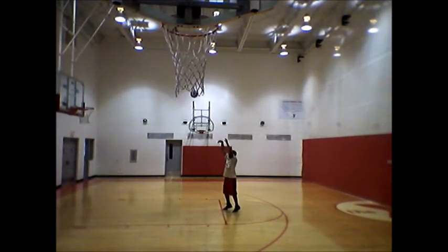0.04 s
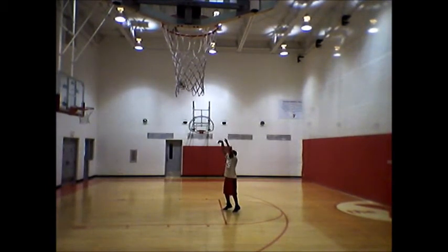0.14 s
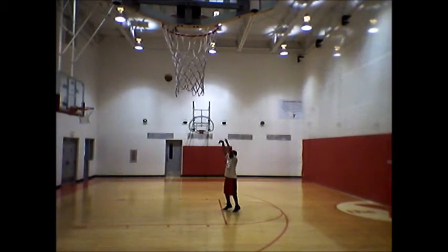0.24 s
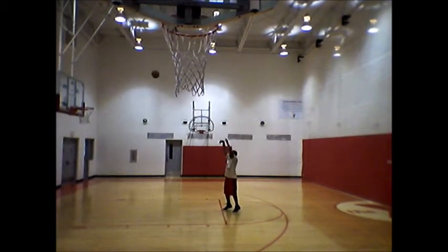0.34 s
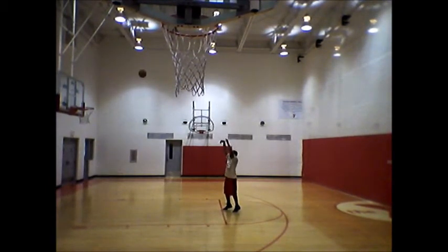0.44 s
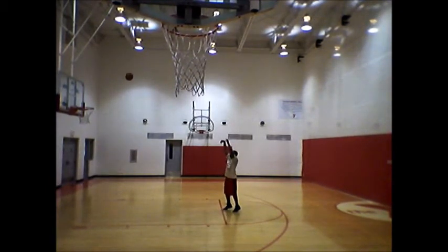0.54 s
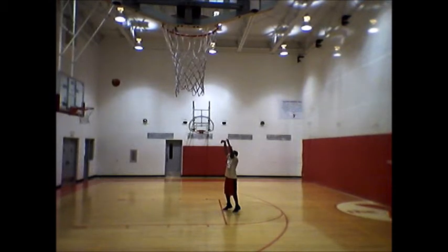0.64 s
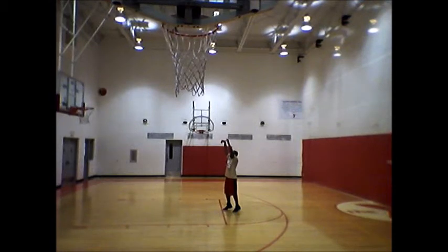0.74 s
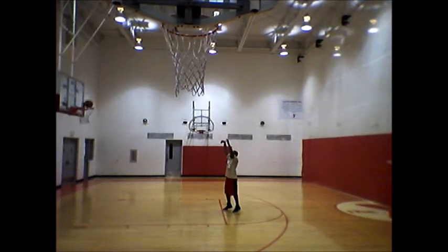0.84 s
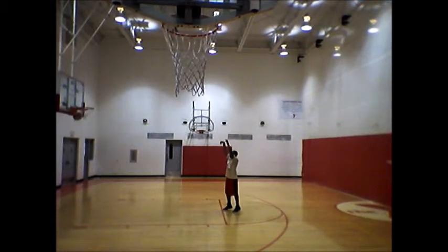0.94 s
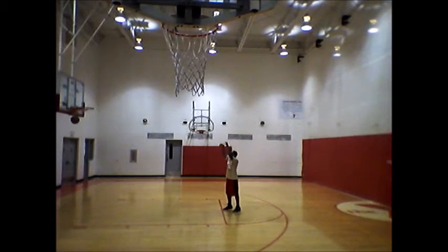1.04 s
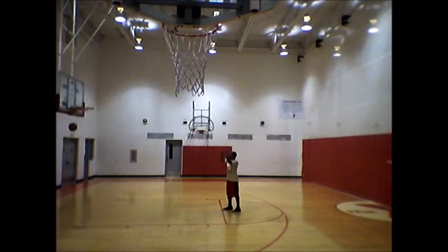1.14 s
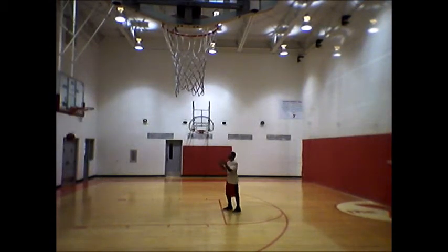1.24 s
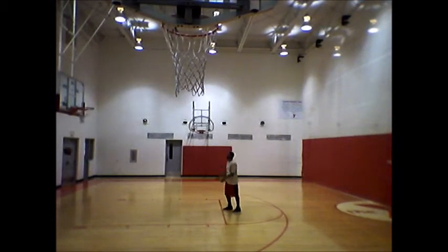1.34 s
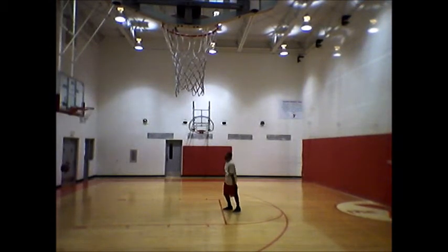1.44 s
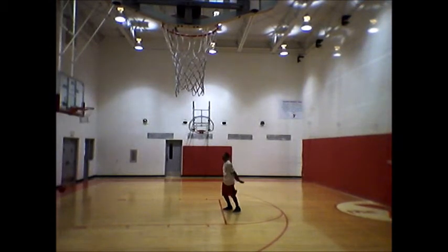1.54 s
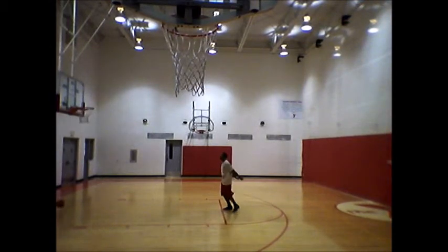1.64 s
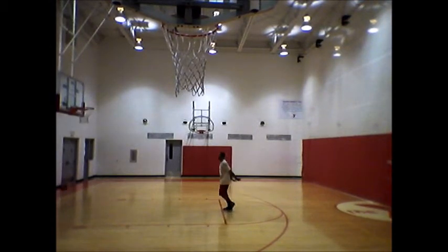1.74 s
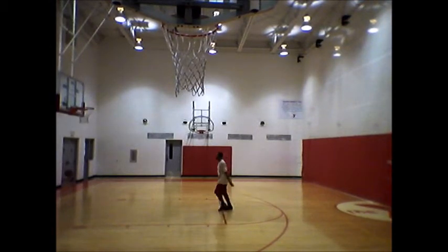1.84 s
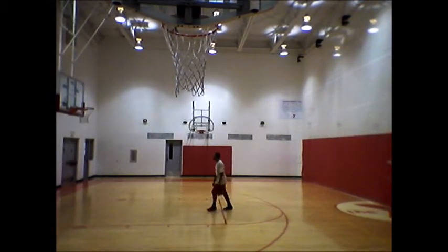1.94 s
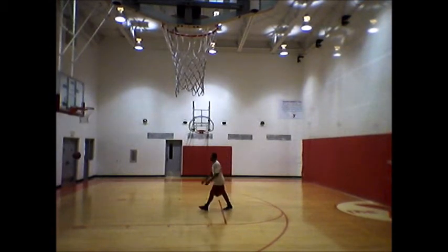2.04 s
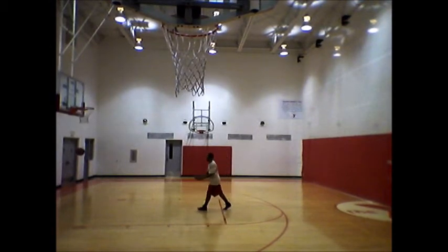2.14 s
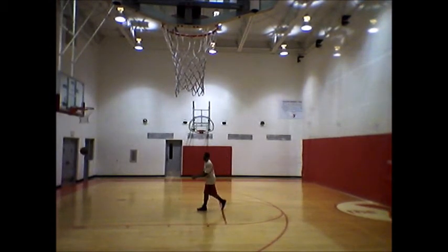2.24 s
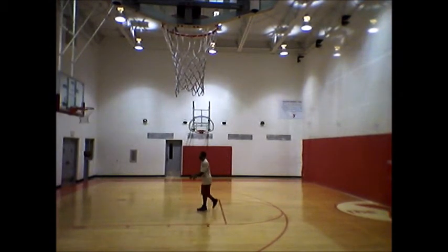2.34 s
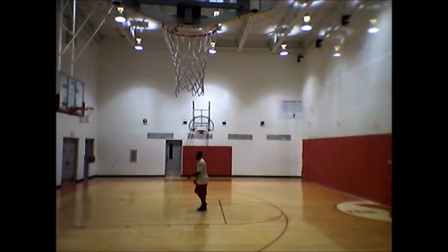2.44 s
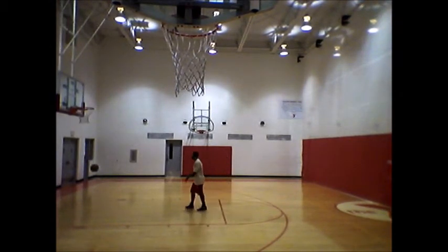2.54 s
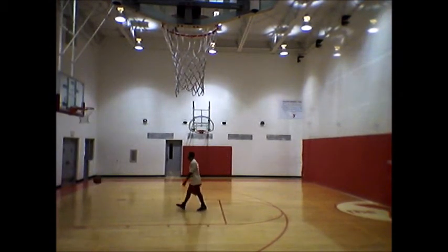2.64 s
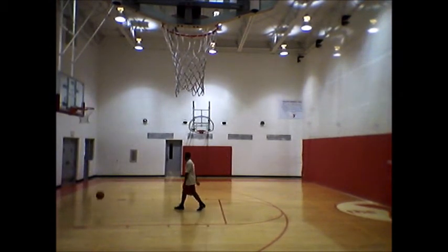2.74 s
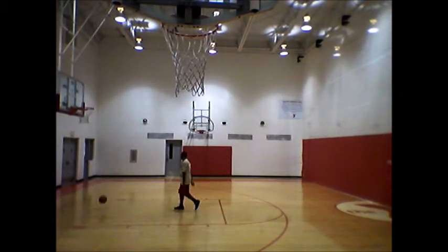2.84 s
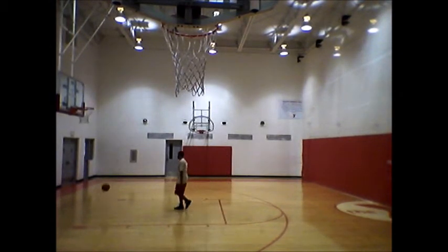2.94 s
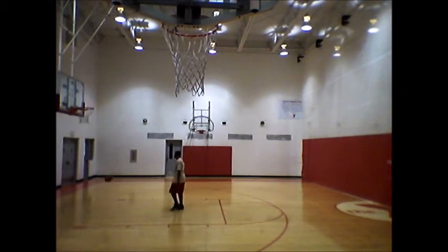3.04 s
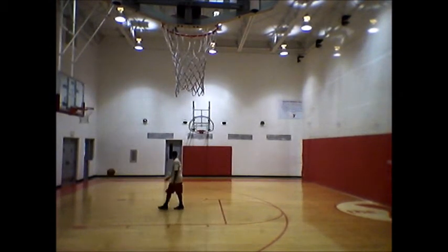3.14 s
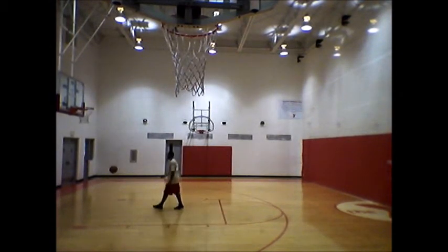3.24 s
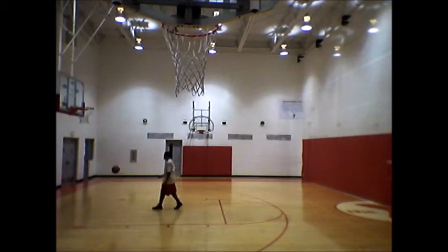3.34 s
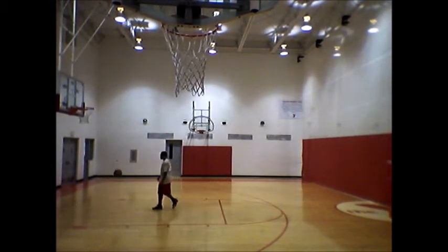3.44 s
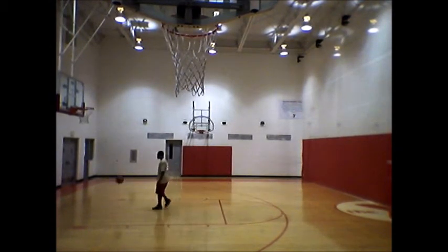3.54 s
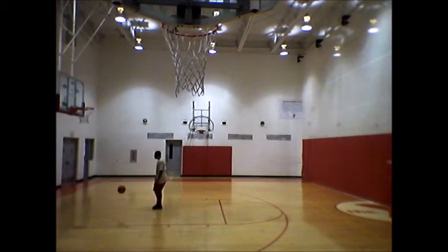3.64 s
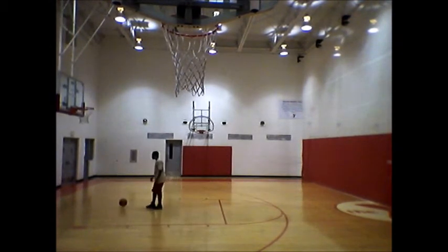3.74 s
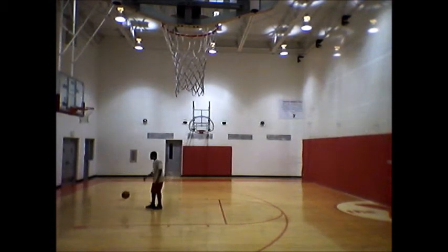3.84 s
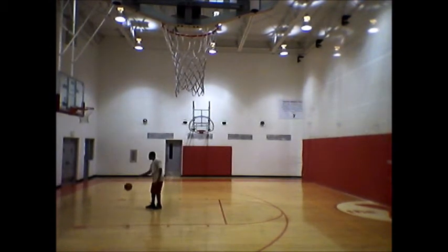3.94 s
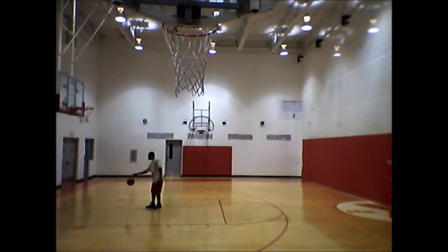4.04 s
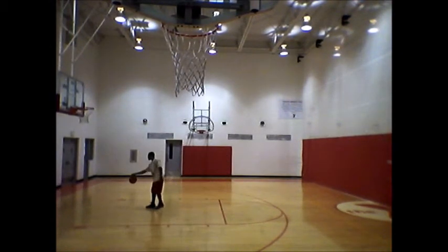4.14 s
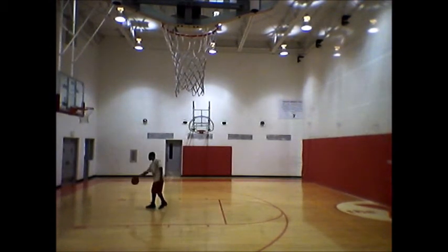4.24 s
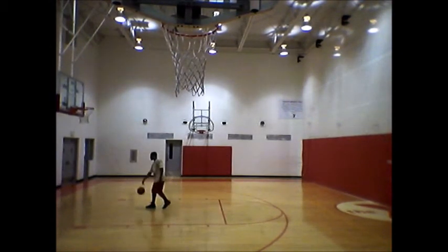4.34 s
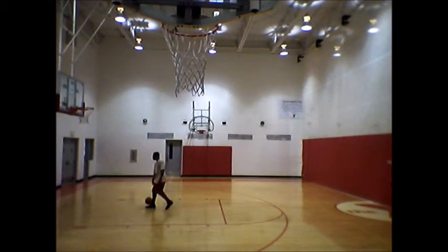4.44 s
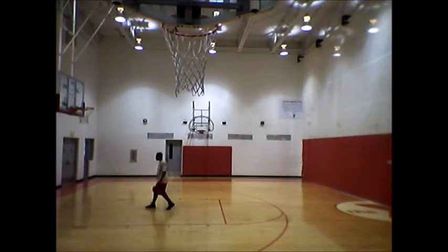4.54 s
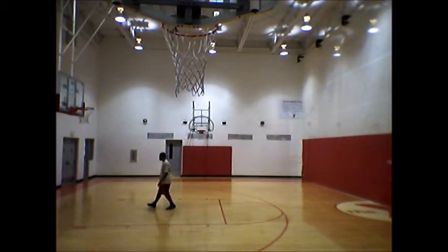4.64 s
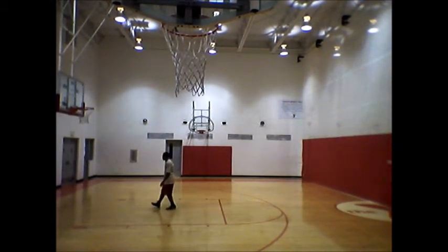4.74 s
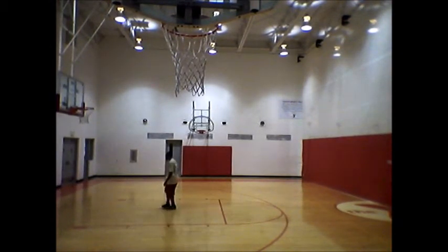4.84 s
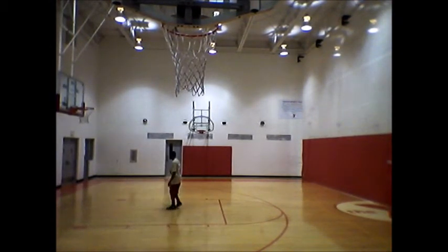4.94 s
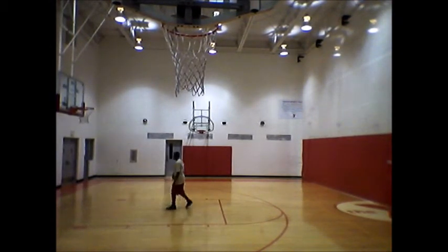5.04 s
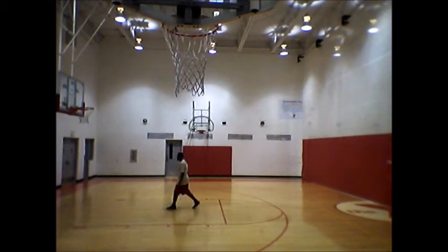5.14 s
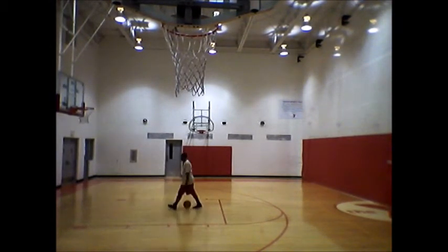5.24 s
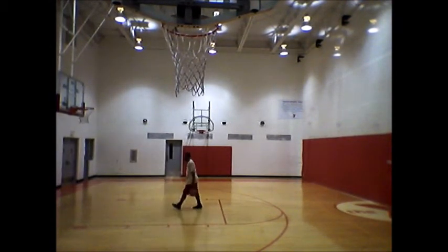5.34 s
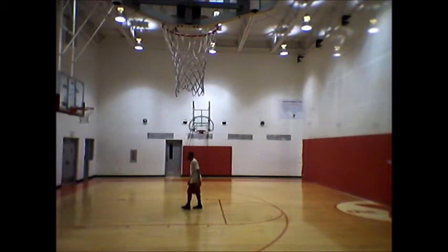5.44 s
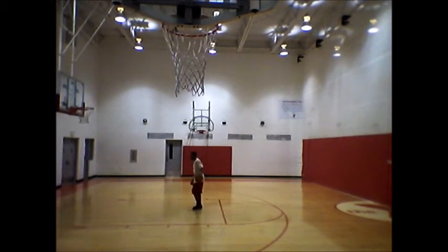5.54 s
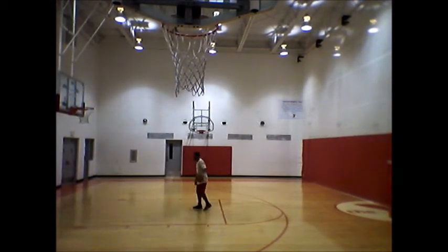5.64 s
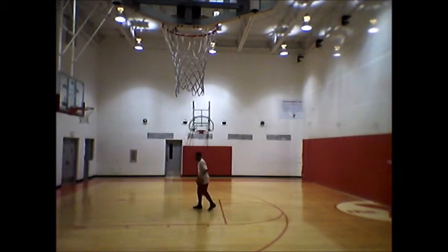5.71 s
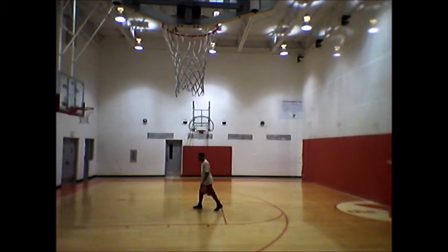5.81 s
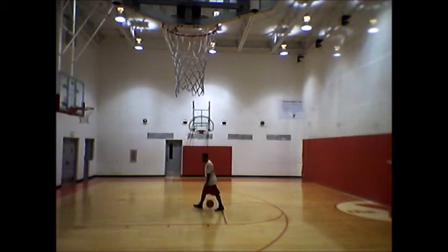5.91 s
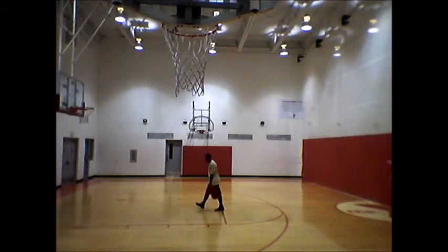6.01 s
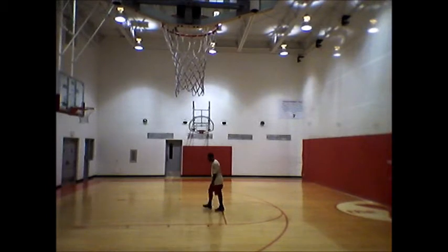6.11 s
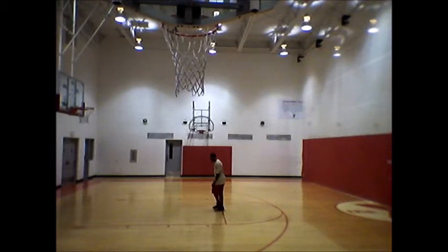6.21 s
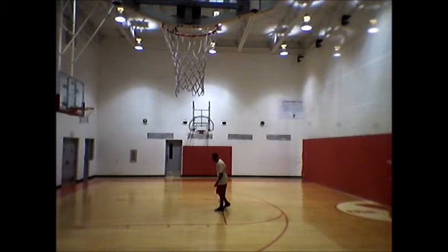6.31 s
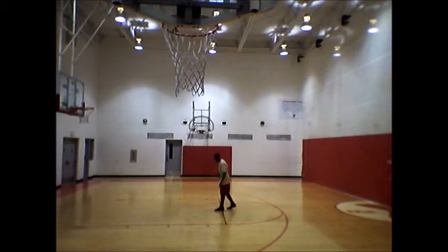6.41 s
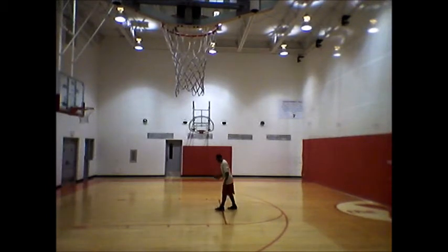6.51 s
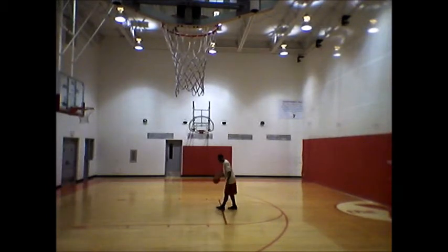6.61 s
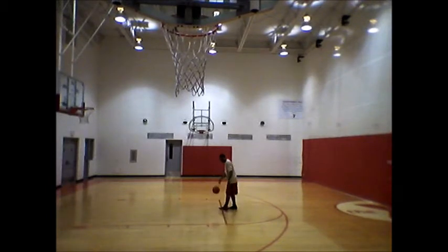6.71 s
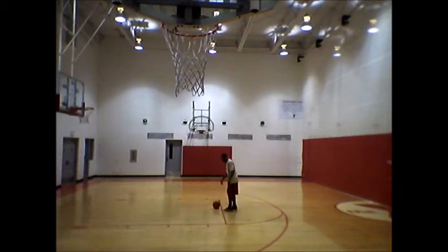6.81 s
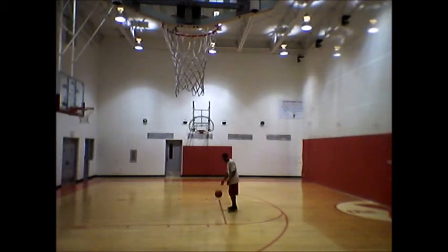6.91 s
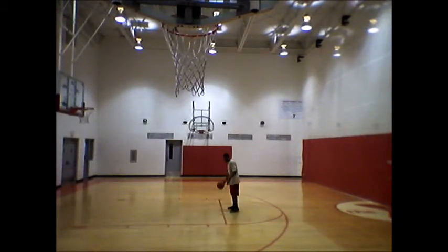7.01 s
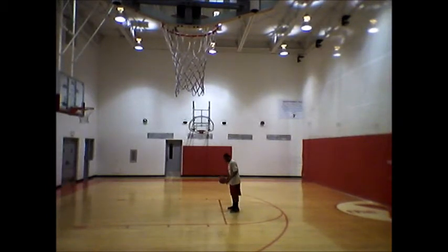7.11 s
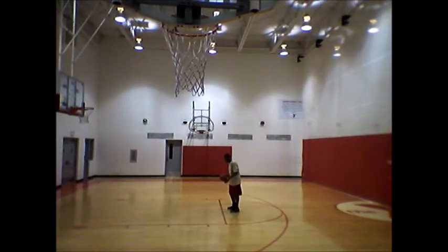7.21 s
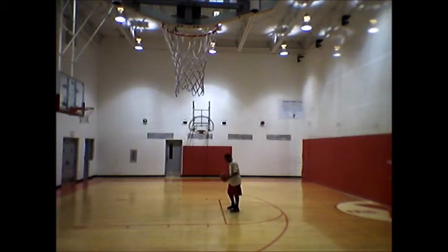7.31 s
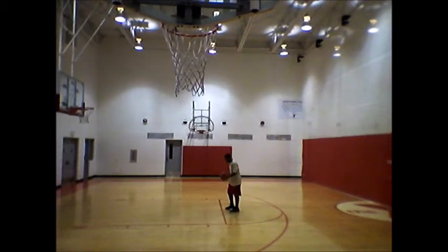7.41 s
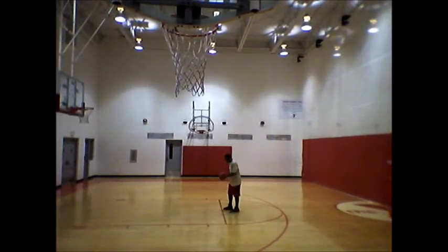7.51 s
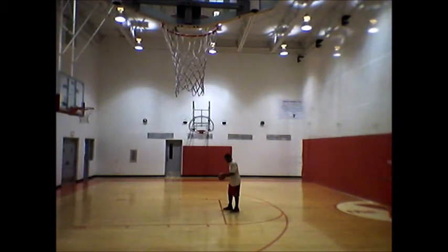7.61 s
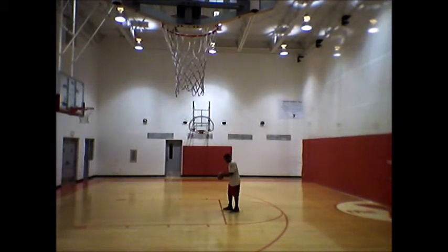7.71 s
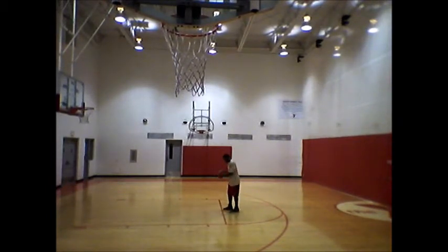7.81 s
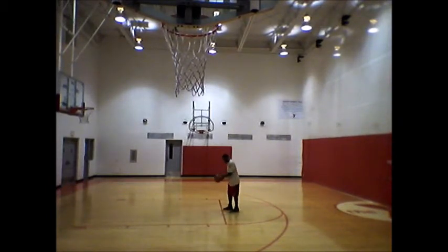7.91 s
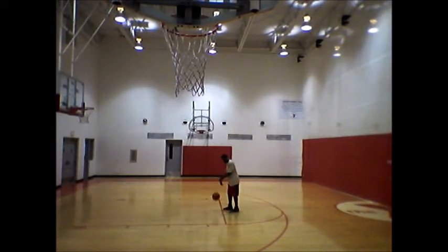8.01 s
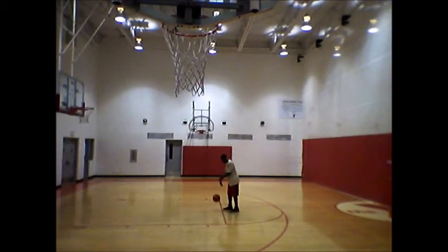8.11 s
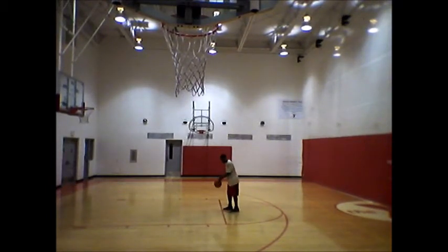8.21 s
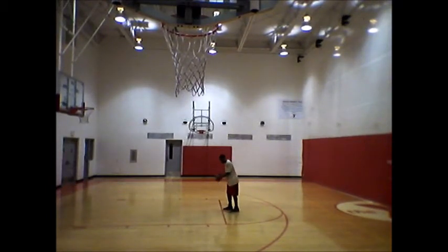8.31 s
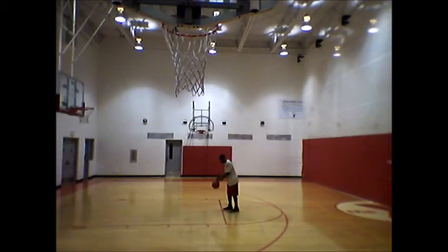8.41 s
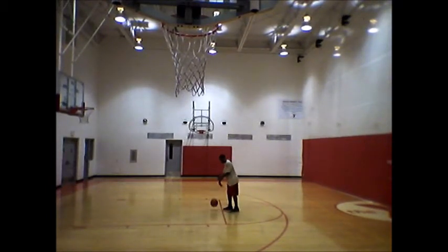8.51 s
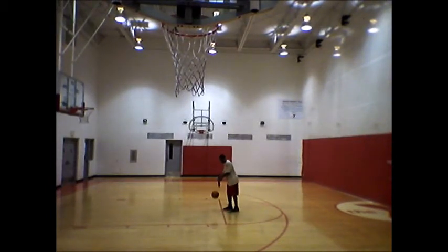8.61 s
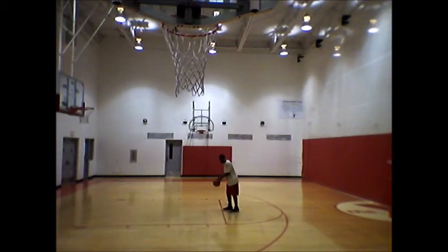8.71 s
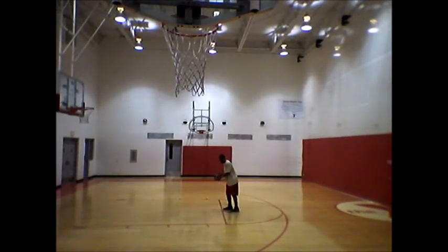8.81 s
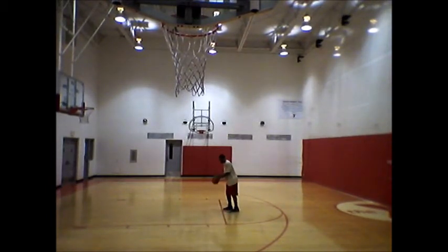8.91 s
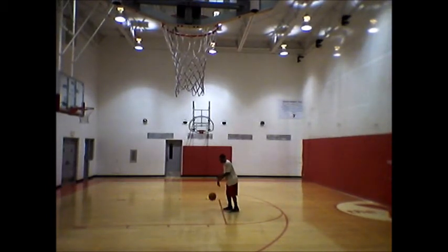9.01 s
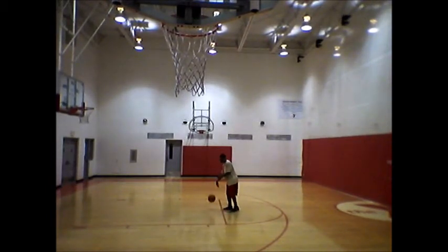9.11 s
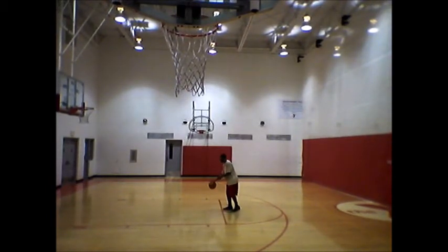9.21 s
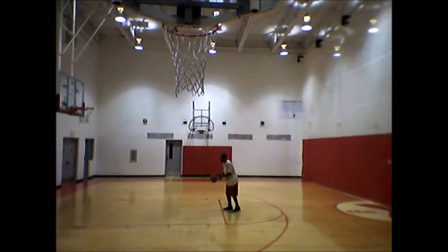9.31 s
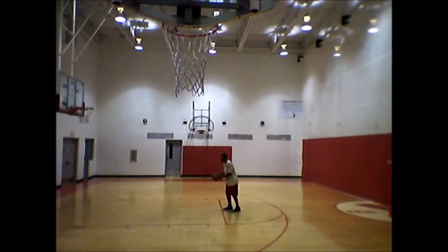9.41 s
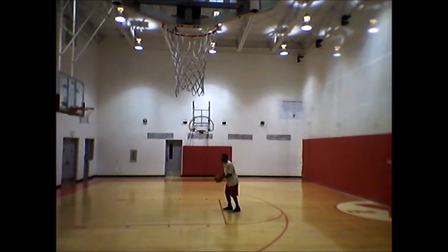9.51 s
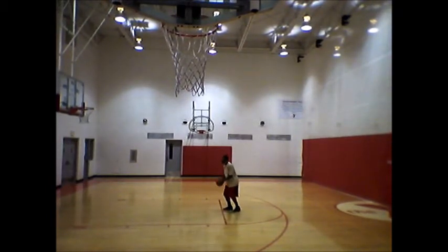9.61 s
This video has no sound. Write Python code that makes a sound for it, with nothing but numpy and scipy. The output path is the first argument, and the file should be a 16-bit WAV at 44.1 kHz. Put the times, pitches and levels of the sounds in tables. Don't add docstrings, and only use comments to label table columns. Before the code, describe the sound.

A soft, quick rattle of a basketball on a far hoop at one second, then ten separate bounces on a sprung wooden floor, unevenly spaced, about half a second to over a second apart. Each is a sharp slap with a short woody thump and hollow ring, echoing off walls and roof. Faint ventilation rush and lamp buzz fill the pauses. One distant microphone, large empty gym.

```python
import sys
import numpy as np
from scipy import signal
from scipy.fft import rfft, irfft, next_fast_len
from scipy.io import wavfile
from scipy.ndimage import minimum_filter1d

SR = 44100
rng = np.random.default_rng(int(sys.argv[2]) if len(sys.argv) > 2 else 0)


def how_loud(loudness_db):
    steps = np.asarray(loudness_db, float) / 20
    return 10 ** steps


def to_wav(sig):
    pcm = np.clip(np.atleast_2d(sig), -1, 1) * 32767
    pcm = np.round(pcm).astype(np.int16)
    wavfile.write(sys.argv[1], SR, pcm.T)


N = 426006

# t/s, slap level/dB, thump level/dB, hall level/dB, slap width/ms
BOUNCES = [
    (1.7423, 3, -13, -28.5, 0.087),
    (2.9190, 1, -26, -30, 0.079),
    (3.8743, -1, -32.5, -30, 0.076),
    (4.5439, 0.5, -23, -30.5, 0.071),
    (5.3481, 2.5, -4.5, -33.5, 0.1),
    (6.0279, -0.5, -9, -32.5, 0.087),
    (6.9128, 2, -13, -35, 0.072),
    (8.1576, 4.5, -11.5, -31.5, 0.075),
    (8.6797, 2.5, -10.5, -33, 0.077),
    (9.2090, 4, -14.5, -30, 0.08),
]
RING_HZ = [955, 1052, 1090, 1057, 1115, 1138, 1060, 930, 1065, 1190]
SPOTS = [(-9.03, 8.03), (-6.78, 9.79), (-5.19, 10.94), (-3.81, 11.86), (1.77, 12.01), (2.92, 11.76),
         (2.62, 11.69), (2.77, 11.58), (2.78, 11.74), (2.75, 11.76)]
# f/Hz, level/dB, time to fall 60 dB/s
BALL_RINGS = [(357, -13.5, 0.057), (427, -10.5, 0.076), (697, -15.5, 0.04), (981, -20.5, 0.15),
              (1082, -1.5, 0.031), (1275, 1.5, 0.013), (1630, -1, 0.011), (1820, -17, 0.0055),
              (2320, -21, 0.028)]
# t/s, level/dB
HOOP_HITS = [(1.0042, -3), (1.0073, -1.5), (1.0150, -2), (1.0227, -4), (1.031, 0), (1.039, 4.5),
             (1.0432, -4), (1.067, 0), (1.0770, -13), (1.098, -13), (1.118, -14), (1.158, -8)]
# f/Hz, level/dB, time to fall 60 dB/s
HOOP_RINGS = [(403, -26, 0.094), (740, -26.5, 0.036), (960, -26, 0.013), (1097, -24.5, .03),
              (1247, -22, 0.024), (1680, -38.5, 0.017)]
MIRRORS = [(-2.91, -4.96, 0.08), (-0.82, 1.26, 11.91), (1.31, 6.3, 17.6), (-1.29, 10.29, 19.67),
           (-10.83, -0.97, 22.48), (-3.18, 5.92, 30.67), (-3.98, -14.36, 22.17), (-2.15, 14.0, 33.8),
           (-12.36, -2.31, 35.73), (-15.21, 28.51, 32.31), (-17.41, 2.95, 44.56), (-23.19, 58.14, 1.3),
           (-12.14, -1.38, 54.99)]
# level re direct sound/dB, change per m the ball lands to the right/dB
MIRROR_GAINS = [(-5, -0.24), (-17.5, 1), (-7, -0.5), (-14, 0), (-5, 0.1), (-11.5, -0.1), (-14.5, -.1),
                (-9, 0.6), (-12.5, 0), (-14.5, -0.7), (-15.5, 0.7), (-15.5, -0.96), (-15, -0.3)]
# f/Hz, time to fall 60 dB/s, level/dB
HALL = [(85, 6.1, -11.5), (120.4, 3.57, 2), (252, 1.95, -2), (375, 1.87, 1.5), (500, 2.5, -9),
        (900, 1.88, 1), (2020, 2.63, -2), (3560, 2.68, -2.5), (5720, 1.93, 1.5), (10440, 1.76, -12),
        (14000, 0.4, -12)]
# f/Hz, level/dB
AIR = [(30, -56.5), (70, -34), (115, -20), (220, -7.5), (400, -7), (700, -9), (1150, -8), (1400, -16),
       (2240, -18), (3500, -22), (5900, -27.5), (7300, -35.5), (9000, -40), (14500, -38.5)]
BUZZ_MULTIPLES = [1, 2, 5, 9, 11, 12, 14, 19, 21, 22, 39, 40, 42, 43, 44, 48, 49, 52, 54]
BUZZ_DB = [-61.5, -46, -70.5, -61.5, -95, -63.5, -66, -60.5, -66.5, -65, -63.5, -63.5, -72.5, -67.5, -66,
           -64.5, -103, -82, -77.5]
# t/s, length/s, threshold raised by/dB
TREBLE_GAPS = [(.96, .03, 12), (1.26, .03, 12), (2.63, .07, 19), (3.57, .04, 16), (4.15, .03, 12),
               (5.16, .03, 10), (5.27, .03, 17), (5.73, .04, 16), (6.6, .03, 14), (7.23, .03, 9),
               (7.36, .03, 11), (7.47, .03, 12)]

TICK_DB, CRACK_DB, CRACK_T60_S = -6, -5, 0.015
SLAP_MS, THUMP_HZ, THUMP_T60_S = 0.064, 338, 0.014
RING_DB, RING_FOLLOWS_THUMP = -8, 0.31
HOOP_TAIL_DB, HOOP_CRACK_DB = -26, -21.5
MIC_HEIGHT_M, SOUND_M_PER_S = 1.2, 343
ECHO_FOLLOWS_HALL, ECHO_SPREAD_DB = 0.4, 1
SCATTER_DB, SCATTER_T60_S = -19, 0.006
BUILD_UP_S, EARLY_DB, EARLY_HOLD_S, EARLY_T60_S = 0.027, -10.5, 0.16, 0.36
AIR_DB, MAINS_BUZZ_HZ = -40.5, 120
MIC_LOW_HZ, MIC_TOP_HZ, MIC_LEAK_DB = 123, 5374, -29.5
RECORDER_LOW_HZ = 75
MASK_DB, MASK_SLOPE = -47, 0.74
SHORT_MASK_DB = 8.5
TOP_HZ, TOP_MASK_SLOPE = 9300, 0.5


def dribble():
    out = np.zeros(N)
    for (at_s, slap_db, thump_db, hall_db, slap_ms), ring_hz, spot in zip(BOUNCES, RING_HZ, SPOTS):
        blow = bounce(slap_db, thump_db, ring_hz, slap_ms)
        path = echoes(spot, hall_db)
        tail = how_loud(hall_db) * hall_tail()
        add(out, through_hall(blow, path, tail), at_s)
    return out


def bounce(slap_db, thump_db, ring_hz, slap_ms):
    seconds = 0.08
    t = np.arange(int(seconds * SR)) / SR
    u = t * 1000 / slap_ms - 3
    slap = how_loud(slap_db) * -u * np.exp(0.5 - u ** 2 / 2)
    tick_at = round(slap_ms * 2 * SR / 1000) + np.arange(3)
    slap[tick_at] += how_loud(slap_db + TICK_DB) * np.array([1, -2, 1])

    thump_hz = THUMP_HZ * np.sqrt(SLAP_MS / slap_ms)
    thump = -how_loud(thump_db) * ring(t, thump_hz, THUMP_T60_S)

    squashed = [(hz * ring_hz / 1075 if hz > 900 else hz, db, t60) for hz, db, t60 in BALL_RINGS]
    ring_db = RING_DB + RING_FOLLOWS_THUMP * thump_db
    ringing = how_loud(ring_db) * struck(squashed, seconds, spread_db=1.5)

    crack = how_loud(slap_db + CRACK_DB) * burst(CRACK_T60_S, seconds)[0] * (u > 3)
    return [slap, thump, ringing, crack]


def struck(modes, seconds, spread_db):
    t = np.arange(int(seconds * SR)) / SR
    luck = rng.standard_normal((len(modes), 2))
    out = np.zeros(len(t))
    for (hz, db, t60), (level_luck, pitch_luck) in zip(modes, luck):
        out += how_loud(db + spread_db * level_luck) * ring(t, hz * (1 + 0.012 * pitch_luck), t60)
    return out


def ring(t, hz, t60):
    return how_loud(-60 * t / t60) * np.sin(2 * np.pi * hz * t)


def burst(t60, seconds, count=1):
    t = np.arange(int(seconds * SR)) / SR
    return how_loud(-60 * t / t60) * rng.standard_normal((count, len(t)))


def hoop():
    out, path = np.zeros(N), np.zeros(SR // 4)
    start_s = HOOP_HITS[0][0]
    for at_s, db in HOOP_HITS:
        path[round((at_s - start_s) * SR)] += how_loud(db - 1.5)
    path = signal.sosfilt(signal.butter(1, 5000, fs=SR, output="sos"), path)
    ringing = struck(HOOP_RINGS, 0.3, spread_db=2.5)
    crack = how_loud(HOOP_CRACK_DB) * burst(0.058, 0.3)[0]
    add(out, through_hall([ringing, crack], path, how_loud(HOOP_TAIL_DB) * hall_tail()), start_s)
    return signal.sosfilt(signal.butter(2, 280, "high", fs=SR, output="sos"), out)


def echoes(spot, hall_db):
    path = signal.unit_impulse(SR // 4)
    right, ahead = spot
    smears = how_loud(SCATTER_DB) * burst(SCATTER_T60_S, 0.02, count=len(MIRRORS))
    smears[:, 0] = 1
    direct_m = np.linalg.norm([right, ahead, MIC_HEIGHT_M])
    for mirror, (db, db_per_m), smear in zip(MIRRORS, MIRROR_GAINS, smears):
        extra_m = np.linalg.norm(np.subtract(mirror, [right, ahead, 0])) - direct_m
        level_db = db + db_per_m * right + ECHO_FOLLOWS_HALL * (hall_db + 31.5)
        level_db += ECHO_SPREAD_DB * rng.standard_normal()
        add(path, how_loud(level_db) * smear, extra_m / SOUND_M_PER_S)
    return path


def hall_tail():
    t = np.arange(int(1.9 * SR)) / SR
    density = np.clip(0.03 + (t / 0.1) ** 2, 0, 1)
    present = rng.random((2, len(t))) < density
    arrivals = rng.standard_normal((2, len(t))) * present / np.sqrt(density)
    hz_axis, t60s, levels = np.transpose(HALL)
    edges = 60 * 2 ** np.arange(0, 8.3, 0.5)
    tail = np.zeros(len(t))
    for k, (low, high) in enumerate(zip(edges, edges[1:])):
        hz = np.sqrt(low * high)
        band_filter = signal.butter(2, [low, high], "band", fs=SR, output="sos")
        band = signal.sosfilt(band_filter, arrivals[k % 2])
        level_db = at_hz(hz, hz_axis, levels)
        tail += how_loud(level_db - 60 * t / at_hz(hz, hz_axis, t60s)) * band
    early = 1 + how_loud(EARLY_DB - 60 * np.maximum(t - EARLY_HOLD_S, 0) / EARLY_T60_S)
    return tail * early * (1 - np.exp(-t / BUILD_UP_S))


def through_hall(parts, path, tail):
    clear = signal.fftconvolve(sum(parts), path)[:len(tail)]
    size = next_fast_len(len(tail) + SR // 4)
    power = sum(np.abs(rfft(part, size)) ** 2 for part in parts[:-1])
    power = power + np.sum(parts[-1] ** 2)
    coloured = irfft(rfft(tail, size) * np.sqrt(power), size)[:len(tail)]
    return np.pad(clear, (0, len(tail) - len(clear))) + coloured


def add(track, sound, at_s):
    i = round(at_s * SR)
    track[i:i + len(sound)] += sound[:N - i]


def at_hz(hz, table_hz, values):
    return np.interp(np.log(hz), np.log(table_hz), values)


def rms_one(x):
    return x / np.sqrt(np.mean(x ** 2) + 1e-20)


def ventilation():
    hz = np.maximum(np.fft.rfftfreq(N, 1 / SR), 1)
    colour = how_loud(at_hz(hz, *np.transpose(AIR)))
    noise = irfft(rfft(rng.standard_normal(N)) * colour, N)
    return how_loud(AIR_DB) * rms_one(noise)


def lamps():
    t, out = np.arange(N) / SR, np.zeros(N)
    knots_s = np.linspace(0, N / SR, 40)
    for multiple, db in zip(BUZZ_MULTIPLES, BUZZ_DB):
        waver_db = 0.86 * np.interp(t, knots_s, rng.standard_normal(40))
        cycles = multiple * MAINS_BUZZ_HZ * t + rng.random()
        out += np.sqrt(2) * how_loud(db + waver_db) * np.sin(2 * np.pi * cycles)
    return out


def microphone(x):
    x = signal.sosfilt(signal.butter(2, MIC_LOW_HZ, "high", fs=SR, output="sos"), x)
    top_cut = signal.sosfilt(signal.cheby1(3, 1.5, MIC_TOP_HZ, fs=SR, output="sos"), x)
    return top_cut - how_loud(MIC_LEAK_DB) * x


def threshold_db(lines):
    loud_db = 10 * np.log10(np.sum(np.abs(lines[0]) ** 2, axis=0) + 1e-12)
    return loud_db, MASK_DB + MASK_SLOPE * (loud_db + 37) - 43.5


def masked(x):
    short = dict(fs=SR, window="cosine", nperseg=256, noverlap=128)
    hz, s, lines = signal.stft(x, **short)
    limit_db = threshold_db(lines)[1] + SHORT_MASK_DB
    lines *= ~((np.abs(lines) < how_loud(limit_db)) & (hz[:, None] > 2000))
    in_short = signal.istft(lines, **short)[1][:, :N]

    frames = dict(fs=SR, window="cosine", nperseg=2048, noverlap=1024)
    hz, s, lines = signal.stft(x, **frames)
    loud_db, limit_db = threshold_db(lines)
    share = rng.uniform(0.4, 1.5, (65, len(s))).repeat(16, axis=0)[:len(hz)]
    for at_s, length_s, raised_db in TREBLE_GAPS:
        limit_db = limit_db + raised_db * share * (np.abs(s - at_s) < length_s / 2 + 0.008)
    limit_db = limit_db + TOP_MASK_SLOPE * np.maximum(loud_db + 41, 0) * (hz[:, None] > TOP_HZ)
    steady = loud_db - minimum_filter1d(loud_db, size=5, origin=2) < 9
    steady[:-1] &= steady[1:]
    lines *= ~((np.abs(lines) < how_loud(limit_db)) & (hz[:, None] > 2000))
    lines = np.where(steady, lines, signal.stft(in_short, **frames)[2])
    return signal.istft(lines, **frames)[1][:, :N]


def scene():
    mono = microphone(dribble() + hoop()) + ventilation() + lamps()
    return np.stack([mono, mono])


def band_limit(x):
    return signal.sosfilt(signal.butter(12, 15890, fs=SR, output="sos"), x)


def record(dry):
    clipped = np.clip(dry, -1, 1)
    low_cut = signal.sosfilt(signal.butter(2, RECORDER_LOW_HZ, "high", fs=SR, output="sos"), clipped)
    top_cut = signal.sosfilt(signal.cheby2(10, 40, 15000, fs=SR, output="sos"), low_cut)
    return band_limit(np.clip(masked(top_cut), -1, 1))


dry = scene()
out = record(dry)
to_wav(out)
```